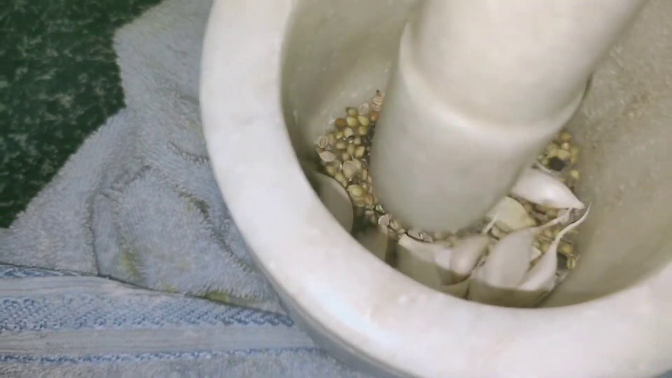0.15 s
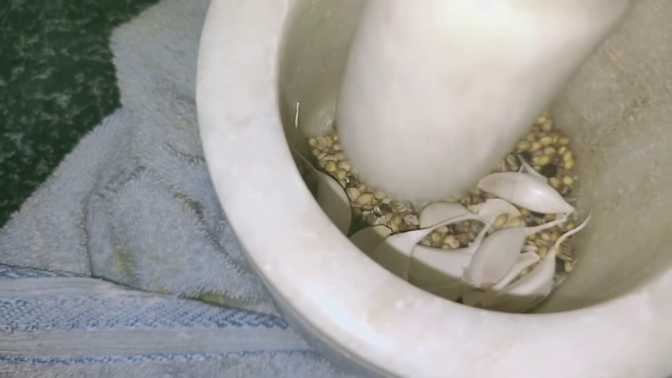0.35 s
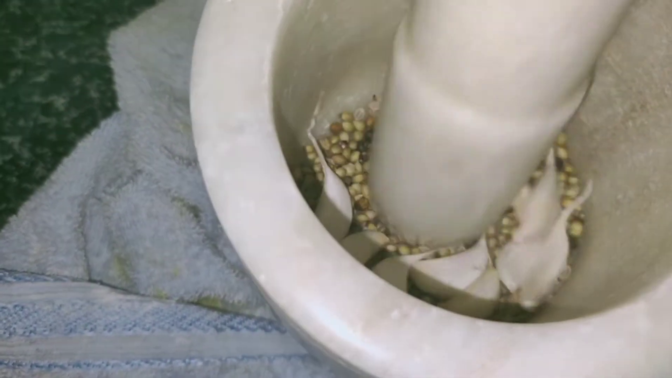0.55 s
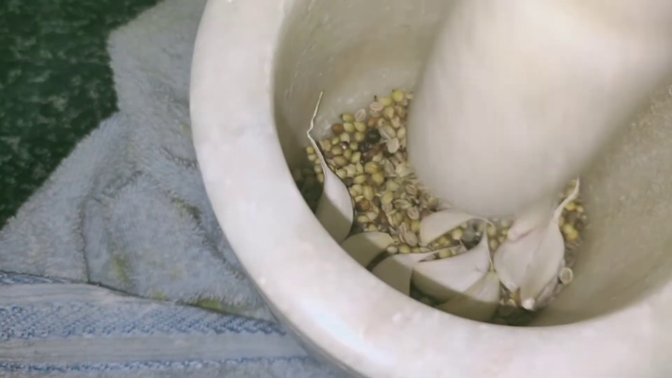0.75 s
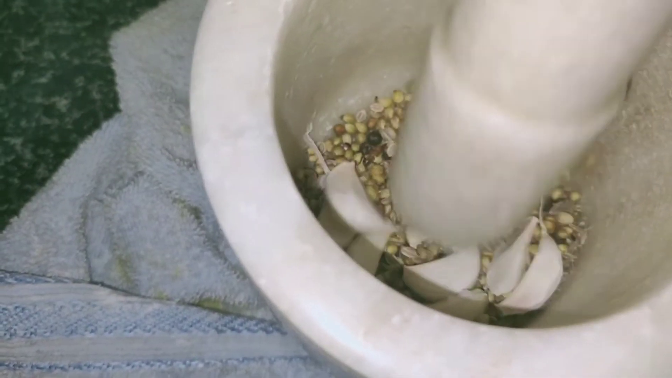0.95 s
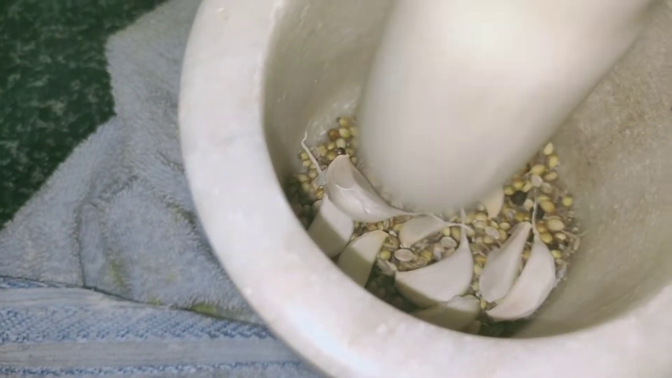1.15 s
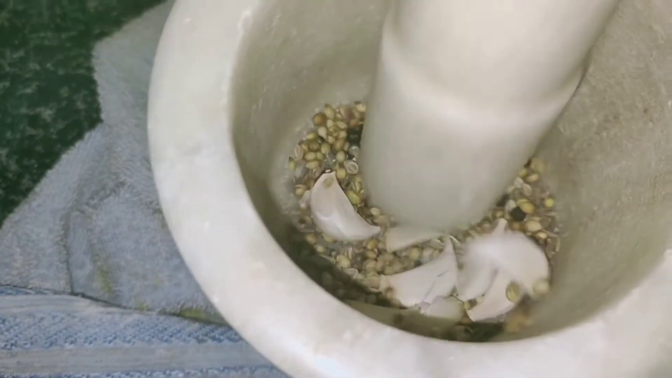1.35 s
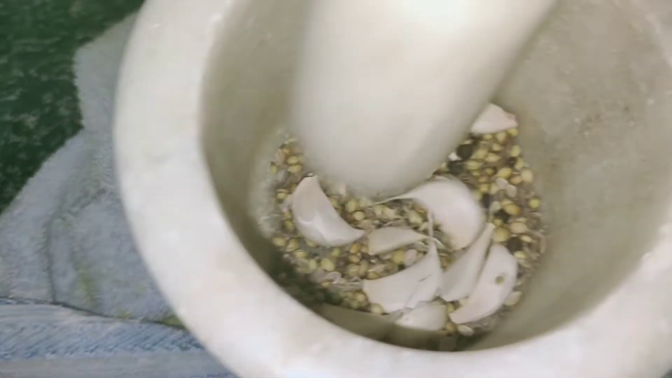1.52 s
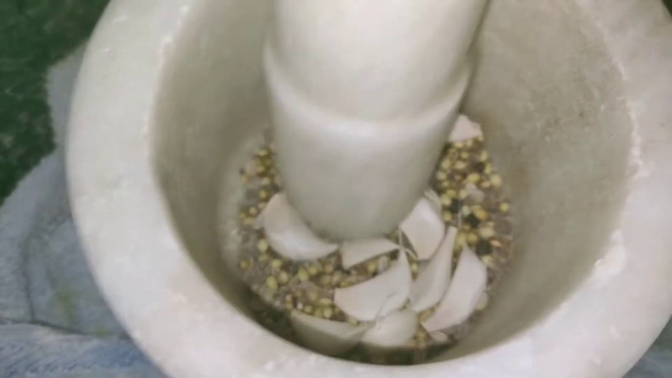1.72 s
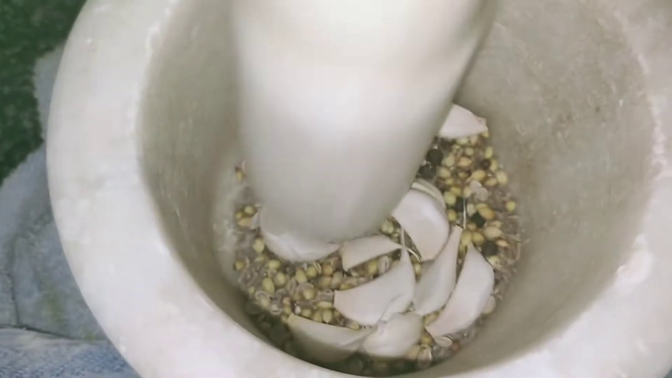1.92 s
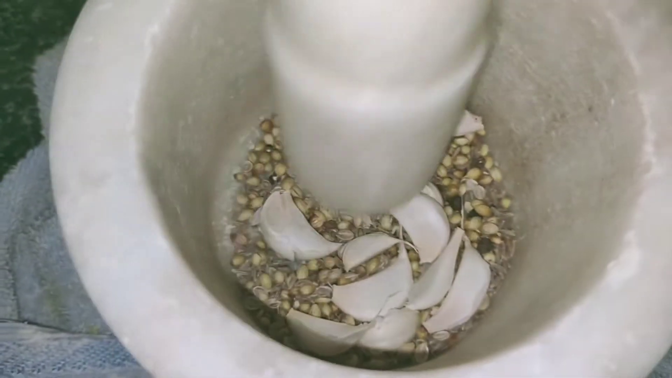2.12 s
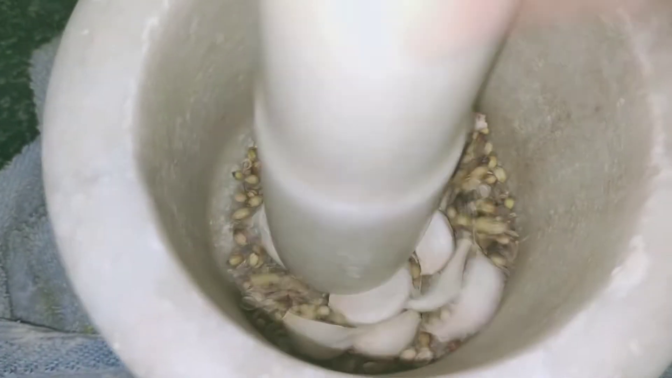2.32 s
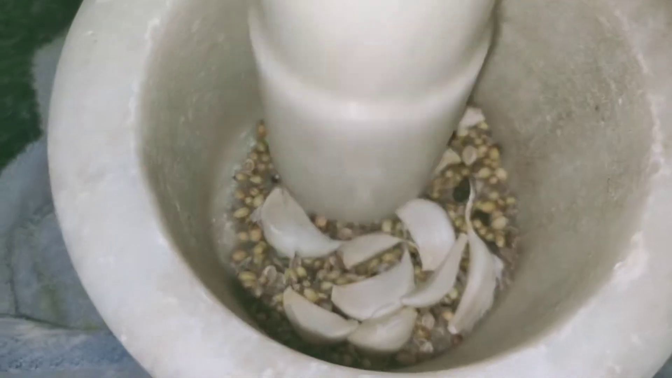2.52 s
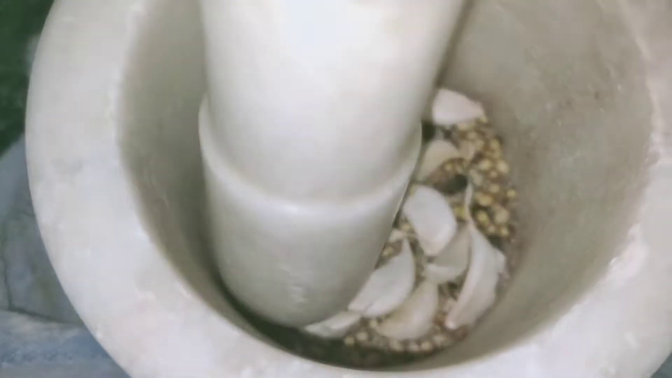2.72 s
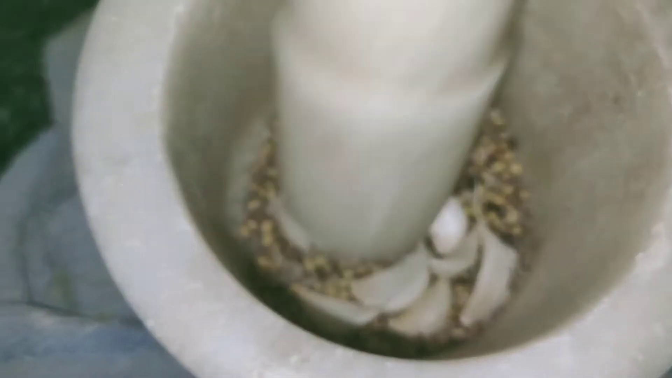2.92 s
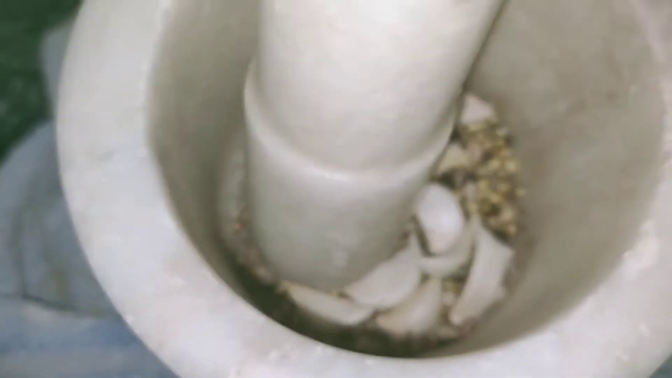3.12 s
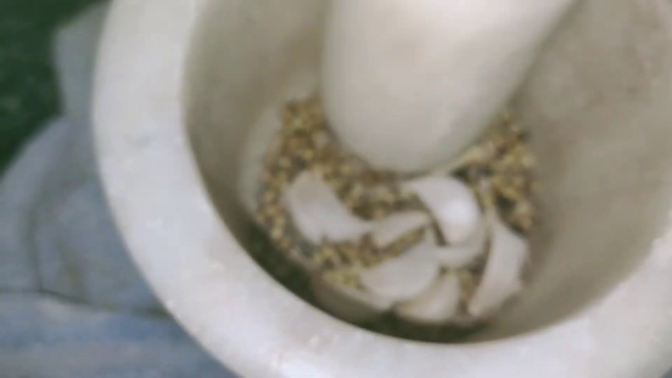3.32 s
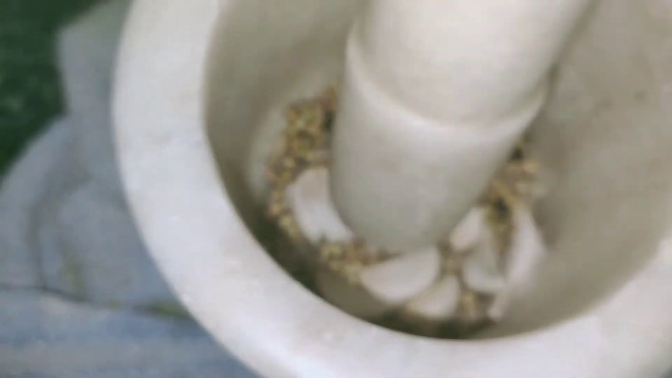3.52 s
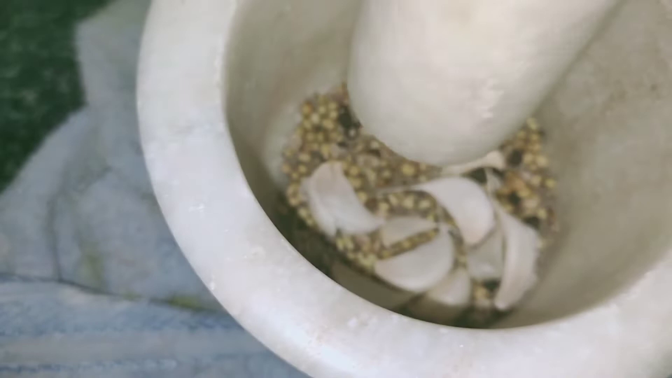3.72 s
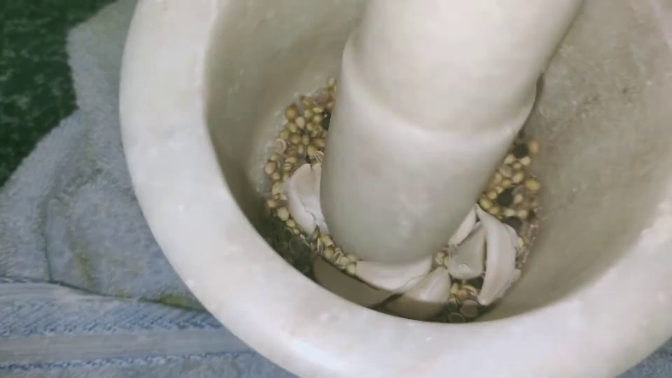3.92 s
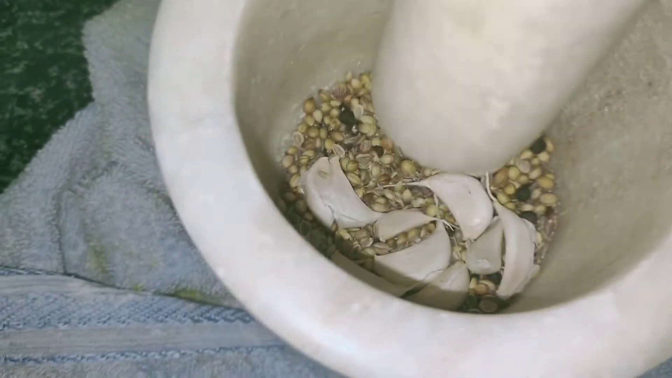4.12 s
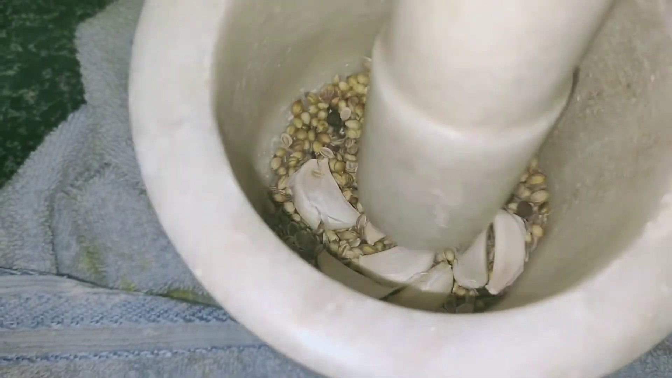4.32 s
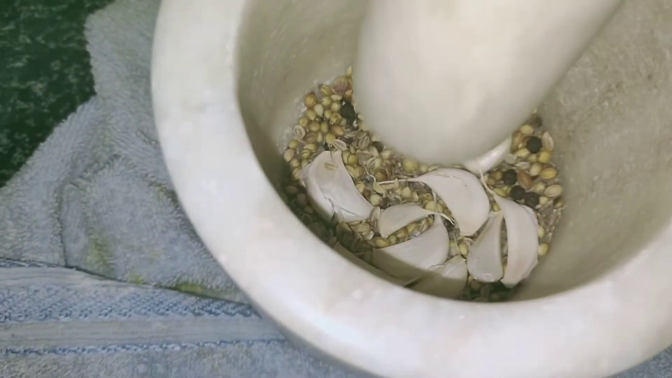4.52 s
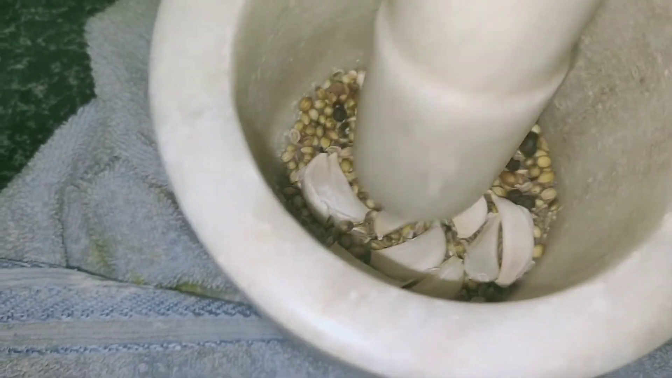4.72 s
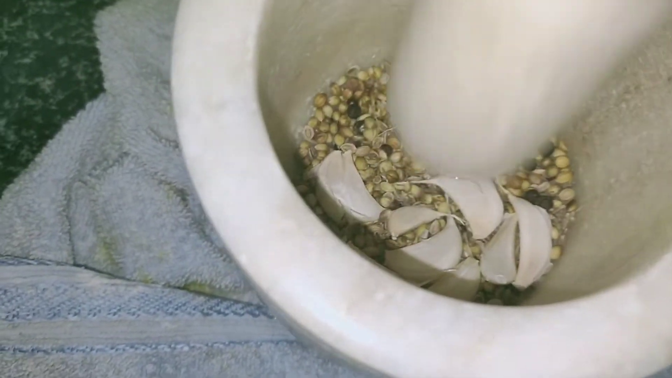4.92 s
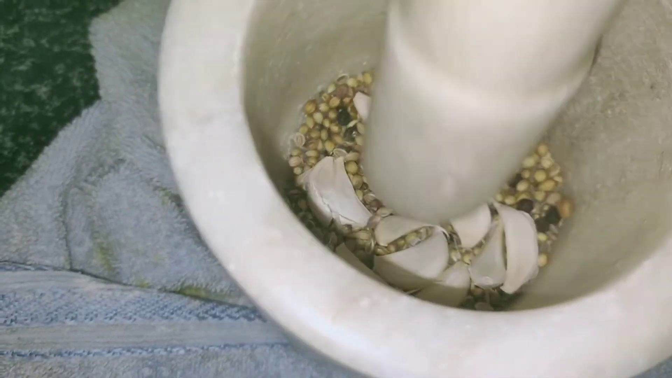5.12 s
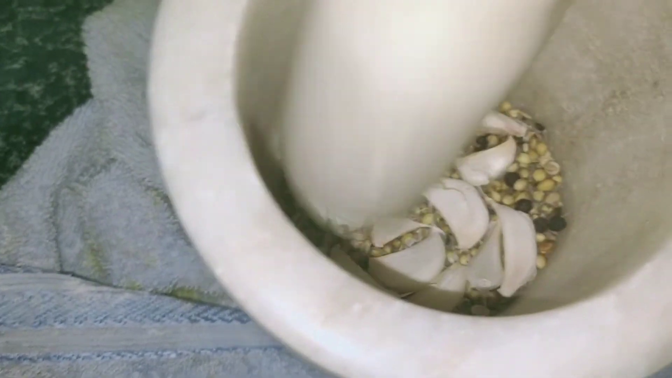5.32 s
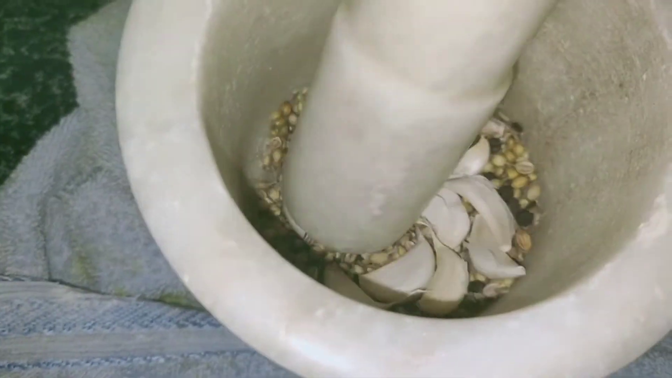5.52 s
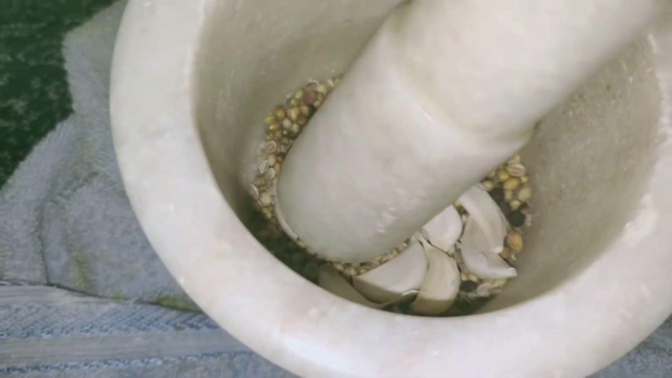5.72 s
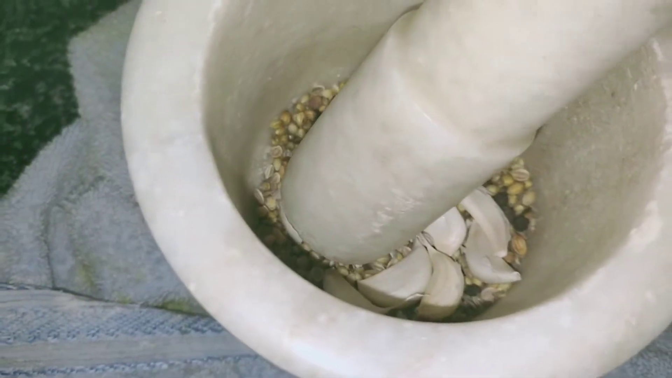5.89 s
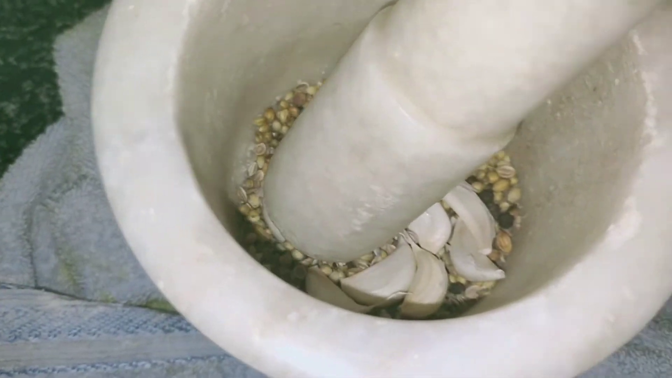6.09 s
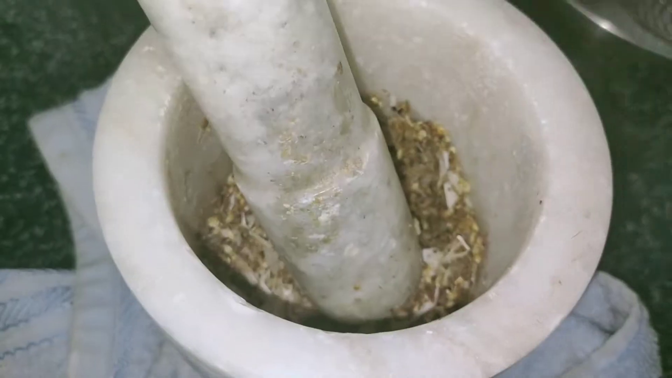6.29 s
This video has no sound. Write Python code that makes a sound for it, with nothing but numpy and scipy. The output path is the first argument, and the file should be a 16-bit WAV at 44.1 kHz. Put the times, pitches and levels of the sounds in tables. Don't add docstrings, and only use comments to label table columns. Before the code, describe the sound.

Very close stereo pickup of a stone pestle pounding whole seeds and garlic in a heavy mortar. About every four tenths of a second, a sharp crunch and short stony knock land with a low counter thud, followed by dry seeds pattering down the bowl. After fourteen blows a small steel utensil bounces quickly, and the pounding stops, leaving faint kitchen hum.

```python
import sys
import numpy as np
from scipy import signal
from scipy.fft import rfft, irfft, next_fast_len
from scipy.io import wavfile
from scipy.ndimage import uniform_filter1d

SR = 44100
rng = np.random.default_rng(int(sys.argv[2]) if len(sys.argv) > 2 else 0)


def persist_wave(psi):
    counts = np.round(np.clip(psi, -1, 1) * 32767).astype(np.int16)
    wavfile.write(sys.argv[1], SR, np.atleast_2d(counts).T)


def makeup_ratio(level_db):
    decades = np.asarray(level_db, float) / 20
    return 10 ** decades


N = 280035


def unit(x):
    return x / np.sqrt(np.mean(x ** 2) + 1e-20)


def along(points, hz):
    point_hz, value = np.transpose(points)
    return np.interp(np.log(hz + 1), np.log(point_hz + 1), value)


def filtered(x, response):
    size = next_fast_len(N + SR // 2)
    return irfft(rfft(x, size) * response(np.fft.rfftfreq(size, 1 / SR)), size)[..., :N]


def coloured(x, spectrum):
    norm = np.sqrt(np.mean(makeup_ratio(along(spectrum, np.linspace(0, SR / 2, num=4096))) ** 2))
    return filtered(x, lambda hz: makeup_ratio(along(spectrum, hz)) / norm)


def add(track, s, sound):
    i = round(s * SR)
    part = sound[..., max(-i, 0):][..., :N - max(i, 0)]
    track[..., max(i, 0):max(i, 0) + part.shape[-1]] += part


def grit(spiky_db, alike):
    sizes = makeup_ratio(spiky_db * uniform_filter1d(rng.standard_normal(N), size=24) * np.sqrt(24))
    shared, own = rng.standard_normal(N), rng.standard_normal((2, N))
    return unit(sizes * (alike * shared + np.sqrt(1 - min(alike, 1) ** 2) * own))


def smooth_field(shape, pitch_bins, time_frames):
    field = uniform_filter1d(rng.standard_normal(shape), size=pitch_bins, axis=0)
    return unit(uniform_filter1d(field, size=time_frames, axis=1))


def patchy(x, depth_db):
    z = signal.stft(x, nperseg=256)[2]
    gain = makeup_ratio(depth_db * smooth_field(z.shape[1:], pitch_bins=4, time_frames=6))
    return signal.istft(z * gain, nperseg=256)[1][:, :N]


def heaps(rows, settle_db):
    flow, t = np.zeros(N), np.arange(-SR // 5, SR // 2) / SR
    after = np.maximum(t, 0)
    for s, db, rise_s, t60 in rows:
        swell = np.exp(-(np.minimum(t, 0) / rise_s) ** 2)
        add(flow, s + t[0], swell * makeup_ratio(db - 60 * after / t60 - settle_db * after ** 2))
    return flow


# start_s, peak_db, coarse_db, fine_db, decay_t60_s
CRUSH_BLOWS = [(0.2706, -20.5, -13.5, -16, 0.14), (0.647, -34.5, -14, -14, 0.034),
               (0.6578, -19, -16.5, -12.5, 0.07), (1.0275, -15.5, -20, -19.5, 0.046),
               (1.0365, -18, -14.5, -14, 0.036), (1.4193, -11, -17, -12.5, 0.036),
               (1.7867, -21.5, -11, -8, 0.039), (2.155, -18, -18, -11.5, 0.053),
               (2.5042, -32, -12, -26, 0.023), (2.5164, -15.5, -11, -19.5, 0.035),
               (2.914, -15.5, -20, -23.5, 0.026), (3.2773, -9, -23, -12.5, 0.02),
               (3.676, -20, -17, -10.5, 0.05), (4.0369, -15.5, -21, -18, 0.024),
               (4.4254, -21, -19, -5.5, 0.025), (4.7979, -8.5, -18, -20.5, 0.0033),
               (5.1795, -15.5, -18.5, -12, 0.032)]
# pitch_hz, level_db
COARSE_BAND = [(900, -30), (2000, -7.5), (3000, 3.5), (4200, -4.5), (5500, -22)]
CRACK_BAND = [(3500, -29), (5000, 1.5), (7000, 2), (9000, 0), (10500, -6.5), (12000, -38)]
DUST_BAND = [(9000, -18), (11000, -5.5), (13000, -8), (16000, -6.5)]


def crush():
    lead_whole_s, lead_crushed_s, crushing_s = 0.0084, 0.0017, 0.3
    swell, t = np.zeros((3, N)), np.arange(-SR // 50, SR // 20) / SR
    after = np.maximum(t, 0)
    for s, db, coarse_db, fine_db, t60 in CRUSH_BLOWS:
        lead = lead_crushed_s + lead_whole_s * np.exp(-s / crushing_s)
        giving_way = 1.5 * np.exp(t / lead) * (t > -3 * lead)
        snap = makeup_ratio(-60 * after / t60) + 2.4 * makeup_ratio(-60 * after / 0.0087)
        mix = makeup_ratio([[db + coarse_db - 11], [db - 21.0], [db + fine_db - 7.5]])
        add(swell, s + t[0], mix * np.where(t < 0, giving_way, snap))
    grains = grit(spiky_db=2, alike=.5)
    bands = COARSE_BAND, CRACK_BAND, DUST_BAND
    return sum(coloured(part * grains, band) for part, band in zip(swell, bands))


# start_s, foot_ring_db, dull_crack_db, bowl_pitch_hz, bowl_ring_db
STONE_KNOCKS = [(0.269, -41, 8.5, 2050, 9.5), (0.659, -40, -1.5, 2220, 4.5), (1.031, -33.5, 2, 2000, -1.5),
                (1.4189, -38, 11, 2124, 14), (1.784, -44, 0.5, 2066, 12), (2.153, -38.5, -3, 2023, 0.5),
                (2.517, -48.5, 8, 1986, 16), (2.913, -38, -32, 2090, 3.5), (3.275, -39.5, -16, 1923, 9),
                (3.674, -37.5, 4, 1937, 3), (4.038, -36, -7.5, 2035, 6), (4.425, -31, -6, 2020, -3.5),
                (4.796, -36.5, -10.5, 2006, 8), (5.178, -26, -5.5, 2060, -10)]
AIR_PUSHES = [-43.5, -37, -44, -25.5, -37, -30, -34.5, -31.5, -38.5, -30, -40, -33, -33.5, -19.5]


def knock():
    x, dull, t = np.zeros((2, N)), np.zeros(N), np.arange(SR // 12) / SR
    u = t / 0.0011
    puff = u * (1 - u / 3.1) * np.exp(-u) * makeup_ratio([[-1.5], [1.5]])
    for (s, db, crack_db, hz, ring_db), push_db in zip(STONE_KNOCKS, AIR_PUSHES):
        foot = makeup_ratio(db + 1 - 60 * t / 0.042) * (1 - np.exp(-t / 0.0012))
        add(x, s, foot * np.sin(2 * np.pi * 860 * t))
        add(x, s - 0.0005, -makeup_ratio(push_db + 16) * puff)
        add(dull, s - .001, makeup_ratio(db + crack_db + 13.5 - 60 * t / 0.019))
        late = np.maximum(t - [[0], [rng.uniform(.00012, .0002)]], 0)
        add(x, s + .001, makeup_ratio(db + ring_db + 1 - 60 * late / .03) * np.sin(2 * np.pi * hz * late))
    dull_band = [(700, -19.5), (1000, 1.5), (1500, -1.0), (2200, -16.5)]  # pitch_hz, level_db
    return x + filtered(dull * grit(spiky_db=0.5, alike=0.98), lambda hz: makeup_ratio(along(dull_band, hz)))


# start_s, level_db, decay_t60_s
TRICKLES = [(-0.1, -41, 0.38), (0.279, -42.5, 0.49), (0.668, -43, 0.42), (1.044, -46, 0.24),
            (1.43, -47, 0.5), (1.798, -49, 0.4), (2.167, -47.5, 0.53), (2.528, -57, 0.4),
            (2.925, -52.5, 0.29), (3.288, -44, 0.42), (3.686, -51.5, 0.35), (4.049, -45.5, 0.23),
            (4.436, -46.5, 0.47), (4.81, -49.5, 0.66), (5.19, -46.5, 0.48)]
# peak_s, level_db, swell_s, decay_t60_s
LATE_SLIPS = [(0.015, -60, 0.012, 0.31), (0.35, -61, 0.014, 0.19), (0.44, -59, 0.041, 0.021),
              (0.765, -53.5, 0.014, 0.21), (0.884, -61, 0.011, 0.16), (1.195, -50, 0.084, 0.39),
              (1.363, -56.5, 0.004, 0.15), (2.258, -59, 0.01, 0.043), (2.64, -59, 0.018, 0.052),
              (2.67, -59, 0.0045, 0.37), (3.012, -46.5, 0.0073, 0.045), (3.37, -55, 0.016, 0.11),
              (4.15, -60, .01, 0.2), (4.575, -62, 0.036, 0.05), (4.919, -49.5, 0.0065, 0.082),
              (5.078, -73, 0.0027, .05), (5.375, -45.5, .001, .02), (5.36, -62, .002, .03),
              (5.39, -62, .01, 0.8)]
# peak_s, level_db, swell_s, decay_t60_s
DULL_TRICKLES = [(3.6, -80, .003, 0.78), (4.708, -87.5, .003, 0.27), (5.078, -88, .003, .4),
                 (5.04, -85.5, .01, 0.38), (.9, -88, .01, .6), (1.59, -82, .005, 0.39)]
# start_s, middle_db, bright_db, dull_db
SEED_TICKS = [(0.2578, -33, -51, -47), (0.3416, -40, -62, -62), (0.4389, -46, -64, -72),
              (0.6873, -24, -52, -52), (0.7174, -42, -57, -60), (0.7644, -42, -59, -56),
              (0.8116, -48, -69, -71), (0.8704, -54, -71, -78), (0.8764, -54, -70, -68),
              (0.8864, -55.5, -71, -67), (1.1224, -46, -55, -62), (1.1423, -49.5, -64.5, -62),
              (1.1817, -39, -56.5, -66), (1.2294, -54.5, -62.5, -66), (1.2476, -53, -70.5, -72),
              (1.259, -44.5, -70, -73), (1.3613, -47.5, -65, -76), (1.5449, -47, -55, -64),
              (1.5863, -39, -60, -68.5), (1.8582, -37, -61, -54), (1.9315, -47.5, -74, -70),
              (2.1929, -34, -60, -60), (2.2518, -39, -61, -57), (2.2583, -29.5, -67, -55.5),
              (2.6224, -48, -62, -59), (2.6289, -36, -56, -50), (2.6424, -33, -56, -58),
              (2.6718, -29, -51, -54.5), (2.6948, -45, -67, -61), (2.9254, -32.5, -47, -51),
              (3.0016, -42.5, -66, -52.5), (3.0131, -30.5, -68, -50.5), (3.3653, -44, -58, -64),
              (3.3852, -40.5, -57.5, -63), (3.4805, -56, -80, -80), (4.1465, -42.5, -63, -68),
              (4.1824, -46, -69, -76), (4.5116, -36, -61, -65), (4.5424, -43, -58, -67),
              (4.8479, -37, -59, -60), (4.9162, -39, -56, -65), (4.9274, -41.5, -51, -65),
              (4.9664, -58, -58, -75), (4.9911, -58, -75, -81), (5.0324, -59, -74, -80),
              (5.0454, -66, -74.5, -82.5), (5.2994, -46.5, -66, -67), (5.3213, -43.5, -68, -72)]
# pitch_hz, level_db
TICK_PART_BANDS = [
    [(4500, -29), (6000, 1), (10000, 0.5), (11500, -30)],
    [(9000, -27.5), (10500, 1), (16000, 1)],
    [(1500, -29.5), (2500, 1), (5000, -5.5), (6500, -28.5)],
]
TICK_TRIM = [-9, 10.5, 6]
# pitch_hz, level_db
PATTER_BAND = [(800, -32.5), (2000, -2.5), (3800, -10.5), (5000, -7.5), (8000, -3), (11000, -8),
               (13000, -9.5), (16000, -4.5)]
# pitch_hz, level_db
HISS_BANDS = [
    [(5000, -29.5), (5800, -13.5), (6300, -5), (7000, 0), (7500, -17), (9000, -25), (11000, -36)],
    [(5500, -47), (7500, -15), (8000, -1), (9000, -7), (9400, -18), (10600, -24.5), (11400, -43)],
]


def trickle():
    spills = [(s, db, .003, t60) for s, db, t60 in TRICKLES]
    flow = heaps(spills + LATE_SLIPS, settle_db=150)
    flow *= makeup_ratio(2.2 * unit(uniform_filter1d(rng.standard_normal(N), size=260)))
    lingering = [(s, db - 29.5, .005, .9) for s, db, _ in TRICKLES]
    last = heaps(lingering + DULL_TRICKLES, settle_db=120)
    ticks, t = np.zeros((3, N)), np.arange(SR // 100) / SR
    for s, *parts_db in SEED_TICKS:
        level_db = np.add(parts_db, TICK_TRIM)[:, None]
        add(ticks, s, makeup_ratio(level_db - 60 * t / 0.0074) * (1 - np.exp(-t / .0002)))
    grains = grit(spiky_db=1, alike=.5)
    clicks = sum(coloured(part * grains, band) for part, band in zip(ticks, TICK_PART_BANDS))
    patter = makeup_ratio(-6.5) * flow * patchy(grit(spiky_db=2.5, alike=.1), depth_db=4)
    soft = last * patchy(grit(spiky_db=3, alike=.1), depth_db=3.5)
    dull = np.array([coloured(x, band) for x, band in zip(soft, HISS_BANDS)])
    return coloured(patter, PATTER_BAND) + clicks + dull


# start_s, level_db
COUNTER_THUDS = [(0.2774, -18.7), (0.664, -16.4), (1.0409, -17.7), (1.4242, -18.9), (1.7929, -16.8),
                 (2.1609, -15.5), (2.5219, -14.9), (2.9193, -16.2), (3.282, -16.9), (3.6796, -15.4),
                 (4.0439, -18.4), (4.4292, -15.1), (4.803, -17.3), (5.1839, -14.3)]
# start_s, level_db
EARLIER_THUD = (-0.068, -30)
# pitch_hz, decay_t60_s, left_swing, right_swing
COUNTER_MODES = [(55.2, 0.168, -0.208, -0.231), (74.5, 0.55, 0.111, 0.119), (87.5, 0.118, 1.65, 1.73),
                 (93.0, 0.408, -0.177, -0.242), (103.7, 0.522, -0.303, -0.31), (119.2, 0.078, -1.97, -1.86),
                 (123.9, 0.164, 0.784, 0.763), (150.8, 0.261, 0.0746, 0.00263),
                 (181.9, 0.114, -0.113, -0.107), (188.8, 0.141, 0.1, 0.0961), (204.6, 0.05, 0.191, 0.176),
                 (230.0, 0.311, -0.0439, -0.0352), (247.3, 0.55, -0.0135, -0.00928),
                 (276.5, 0.185, -0.0213, -0.0214), (287.8, 0.174, 0.137, 0.147),
                 (294.5, 0.185, -0.304, -0.314), (298.9, 0.265, 0.189, 0.19),
                 (326.9, 0.282, -0.0274, -0.0303), (342.0, 0.213, 0.0269, 0.0254),
                 (374.2, 0.55, 0.0013, 0.00682), (407.9, 0.316, -0.00274, -0.00968)]
# pitch_hz, level_db
RATTLE_BAND = [(250, -23.5), (400, -1), (550, -7), (700, 1), (850, -11.5), (1200, -16.5), (2000, -17),
               (4000, -35)]
# pitch_hz, level_db
FLOOR_BAND = [(25, -18.5), (45, -3), (75, 7.5), (105, 2.5), (170, -8), (240, -3.5), (400, -54.5)]


def counter():
    thud, shake, boom = np.zeros((2, N)), np.zeros(N), np.zeros(N)
    t, modes = np.arange(SR // 2) / SR, 0
    for hz, t60, *swing in COUNTER_MODES:
        modes = modes + np.outer(swing, makeup_ratio(-60 * t / t60) * np.sin(2 * np.pi * hz * t))
    for s, db in [EARLIER_THUD, *COUNTER_THUDS]:
        add(thud, s, makeup_ratio(db) * modes)
        add(shake, s, makeup_ratio(db - 23.0) * (t / 0.039) ** 1.19 * np.exp(1.5 - t / 0.03))
        add(boom, s, makeup_ratio(db - 18.0 - 60 * t / 0.58))
    rattle = filtered(shake * grit(spiky_db=0.0, alike=0.47), lambda hz: makeup_ratio(along(RATTLE_BAND, hz) + 12.0))
    return thud + rattle + coloured(boom * grit(spiky_db=-2.5, alike=0.89), FLOOR_BAND)


BOUNCE_STARTS = [5.379, 5.4108, 5.441, 5.4647, 5.4837]
# peak_db, mid_ring_db, high_ring_db
BOUNCE_LEVELS = [
    (-8, -16, -27),
    (-15.5, -21, -33),
    (-22, -34, -40),
    (-24.5, -8, -36),
    (-27.5, -40, -40),
]
# pitch_hz, level_db, decay_t60_s
STEEL_MODES = [(780, -10, .025), (855, -5, .035), (1150, -15, .015), (1500, -11, .012), (1884, -3, .028),
               (1920, -15, .14), (1976, -4, .036), (3440, -18, .035), (4231, -21, .09), (4222, -34, .3),
               (6040, -30, .02), (7144, -26, .075), (10070, -33, .06), (11620, -36, .045)]


def utensil():
    x, t = np.zeros((2, N)), np.arange(SR // 3) / SR
    lean_db = np.array([[-1.8], [1.8]])
    for s, (db, mid_db, high_db) in zip(BOUNCE_STARTS, BOUNCE_LEVELS):
        late = np.maximum(t - [[.00014], [0]], 0)
        press = (late / .00065 * np.exp(1 - late / .00065)) ** 2
        contact = press * (np.sin(2 * np.pi * 1250 * late) - .3)
        edge = makeup_ratio(high_db + 17 - 60 * late / .012) * (1 - np.exp(-late / .0005))
        contact += edge * np.sin(2 * np.pi * 2950 * late)
        add(x, s, makeup_ratio(db - 0.5 + lean_db) * contact)
        for hz, level_db, t60 in STEEL_MODES:
            if hz < 1700:
                lift_db = 0
            elif hz < 2500:
                lift_db = (high_db + 30) / 2
            elif hz < 5200:
                lift_db = mid_db + 14
            else:
                lift_db = high_db + 24
            side = makeup_ratio(rng.normal(0, 1.5, (2, 1)) + lean_db)
            late = np.maximum(t - rng.uniform(0, .00008, (2, 1)) - [[.0001], [0]], 0)
            swing = makeup_ratio(db - 3 + level_db + lift_db - 60 * late / t60) * (1 - np.exp(-late / .0005))
            sign = -1 if 1500 < hz < 2500 else 1
            add(x, s + 0.00053, sign * side * swing * np.sin(2 * np.pi * hz * late))
    return x


# pitch_hz, decay_t60_s
ROOM_DECAY = [(200, 0.38), (1000, 0.53), (4000, 0.33), (8500, 0.13), (13000, 0.03)]


def kitchen(x):
    hz, t, z = signal.stft(rng.standard_normal((2, SR // 2)), SR, nperseg=256)
    tail = signal.istft(z * makeup_ratio(-60 * t / along(ROOM_DECAY, hz)[:, None]), SR, nperseg=256)[1]
    delayed = np.pad(x, ((0, 0), (150, 0)))
    return signal.fftconvolve(delayed, tail / np.linalg.norm(tail[0]), axes=1)[:, :N]


# pitch_hz, level_db
HUM_BAND = [(15, -60), (25, -30), (32, -10.5), (69, -9), (86, -7.5), (102, 1), (140, -26), (294, -4),
            (604, -18), (644, -17.5), (849, -16.5), (1240, -19), (2250, -25.5), (4000, -61), (5200, -98),
            (8800, -120)]
# pitch_hz, likeness (1 = same in both ports)
HUM_LIKENESS = [(60, 0.89), (180, 0.94), (550, 0.58), (1650, -0.31), (4970, 0.12), (15000, -0.15)]


def hum():
    z = signal.stft(rng.standard_normal((2, N)), nperseg=512)[2]
    gain = makeup_ratio(1.2 * smooth_field(z.shape[1:], pitch_bins=3, time_frames=12))
    pair = signal.istft(z * gain, nperseg=512)[1][:, :N]

    def spread(hz):
        angle = np.arccos(np.clip(along(HUM_LIKENESS, hz), -1, 1)) / 2
        return makeup_ratio(along(HUM_BAND, hz)) * [np.cos(angle), np.sin(angle)]

    mid, side = filtered(pair, spread)
    return makeup_ratio(-52) * unit(np.array([mid + side, mid - side]))


# peak_s, level_db, swell_db_per_s, fade_db_per_s
FAR_SIZZLE = (5.65, -70.5, 100, 24)
# start_s, end_s, pitch_hz, level_db
FAR_WHINE = (4.86, 5.17, 673, -62)


def far():
    t = np.arange(N) / SR
    peak, db, swell_db, fade_db = FAR_SIZZLE
    level_db = db - np.where(t < peak, swell_db * (peak - t), fade_db * (t - peak))
    noise = patchy(grit(spiky_db=-2.5, alike=0.14), depth_db=1.0)
    hiss = makeup_ratio(level_db - 3.5) * np.array([coloured(x, band) for x, band in zip(noise, HISS_BANDS)])
    start, end, hz, db = FAR_WHINE
    drift = np.cumsum(rng.standard_normal(N)) * 0.0056
    swell = np.clip(np.minimum(t - start, end - t) / 0.03, 0, 1)
    return hiss + makeup_ratio(db) * swell * np.sin(2 * np.pi * hz * t + drift)


def scene():
    seeds, stone, steel, patter = crush(), knock(), utensil(), trickle()
    room = kitchen(makeup_ratio(-15.5) * seeds + makeup_ratio(-24.5) * stone + makeup_ratio(-21.0) * steel + makeup_ratio(-12) * patter)
    return seeds + stone + steel + room + patter + counter() + hum() + far()


def low_pass(x):
    return signal.sosfilt(signal.butter(12, 16640, fs=SR, output="sos"), x)


# pitch_hz, width_hz, level_db
PORT_RESONANCES = [
    (6540, 830, 6.5),
    (8820, 1050, 12.5),
]


def record(dry):
    top_hz, left_lag_s, end_s = 15600, .00008, 6.112

    def ports(f):
        lift = np.array([1 + makeup_ratio(db) * 1j * f * width / (centre ** 2 - f * f + 1j * f * width)
                         for centre, width, db in PORT_RESONANCES])
        lag = np.exp(-2j * np.pi * f * np.array([[left_lag_s], [0]]))
        return lift * lag * makeup_ratio(-np.maximum(f - top_hz, 0) * .045)

    gate = np.clip((end_s - np.arange(N) / SR) / 0.0021 + 1, 0, 1)
    return low_pass(gate * filtered(dry, ports))


dry = scene()
out = record(dry)
persist_wave(out)
```